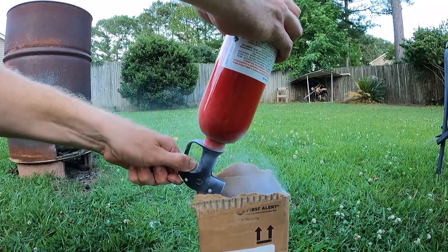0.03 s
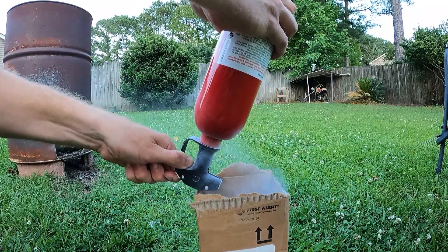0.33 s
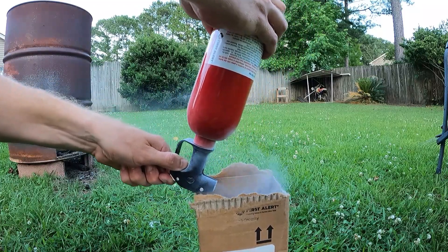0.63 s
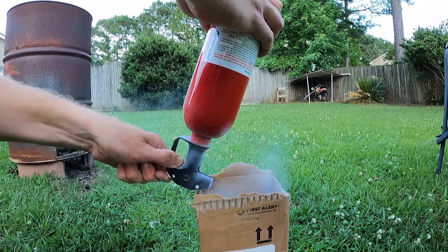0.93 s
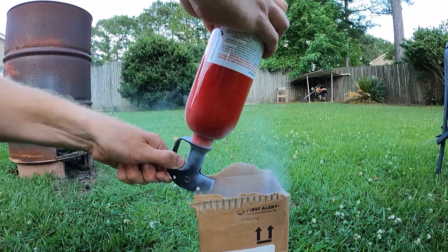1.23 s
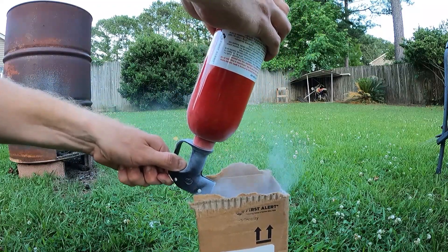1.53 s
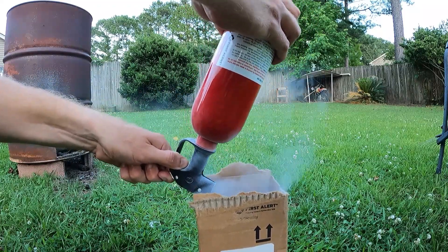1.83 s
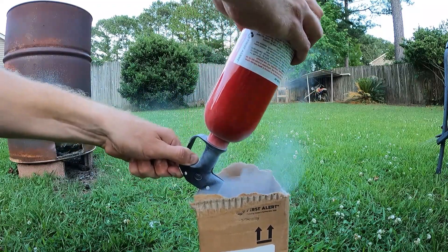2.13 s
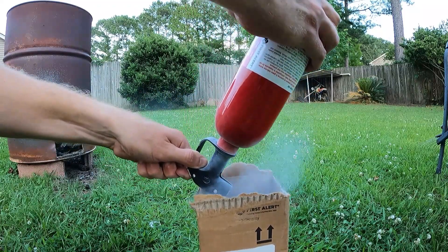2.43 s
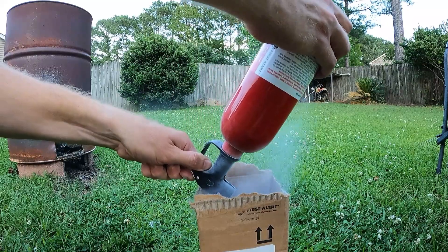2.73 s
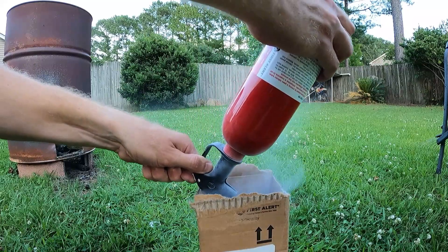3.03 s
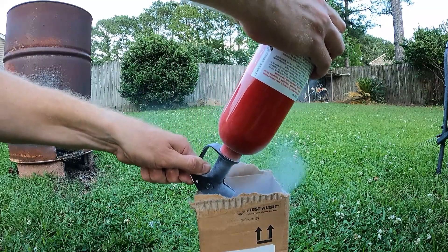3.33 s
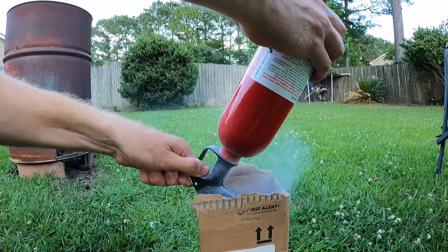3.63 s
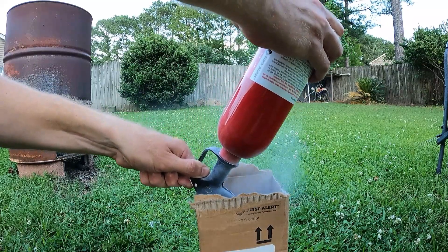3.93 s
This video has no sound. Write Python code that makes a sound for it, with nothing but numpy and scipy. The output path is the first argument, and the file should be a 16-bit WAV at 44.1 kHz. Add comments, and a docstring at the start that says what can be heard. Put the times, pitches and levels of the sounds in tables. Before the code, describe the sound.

A fire extinguisher hisses thinly into a cardboard box, close by, then pops into a sputtering burst and settles into a steadier rush. Behind it are low wind, faint sprinkler-like chuffing and one short bird phrase.

```python
"""Gas escapes from the valve of an upturned fire extinguisher into a cardboard box, on a lawn.
It starts as a thin seep over low wind and a faint, regular chuffing like a far sprinkler.
Two soft rustles pass and a bird sings one phrase. At 1.4 s the valve cracks open in a popping,
sputtering burst of gas and sizzling powder, which sinks back by 2 s.
From 2.5 s the valve opens to a steadier rush, coloured by the resonances of box and nozzle."""
import sys
import numpy as np
from scipy import signal
from scipy.fft import rfft, irfft
from scipy.io import wavfile
from scipy.ndimage import map_coordinates

SR = 44100
rng = np.random.default_rng(int(sys.argv[2]) if len(sys.argv) > 2 else 0)


def store_pcm(level_fs):
    """Save levels as 16-bit WAV."""
    pcm = np.round(np.clip(level_fs, -1, 1) * 32767).astype(np.int16)
    wavfile.write(sys.argv[1], SR, np.atleast_2d(pcm).T)


N = 176400


def jet(colour, flutter_db, flutter_hz, spit_db, spits_per_s):
    """Turbulent gas flutters and spits as powder clears the valve; resonances drift as the hands move."""
    clumps = (rng.random(N) < spits_per_s / SR) * np.minimum(rng.exponential(1, N), 3)
    spit_decay = np.exp(-np.arange(400) / (SR * 0.0005))
    spits = signal.oaconvolve(clumps, spit_decay)[:N]
    flow = amp(flutter_db * wander(flutter_hz)) * (1 + amp(spit_db) * spits)
    warped_time = np.cumsum(1 + 0.002025 * wander(rate_hz=3.94))  # bends all resonances together
    hiss = stereo_noise(colour, boxed=True, envelope=flow)
    return np.array([map_coordinates(side, [warped_time], order=5, mode="mirror") for side in hiss])


def seep():
    """Gas leaks through the barely open valve in a smooth, half-whistling hiss."""
    # leak envelope: t/s, level/dB
    flow = [(0, -57.5), (.6, -54.5), (.8, -53.5), (1.3, -52), (2.0, -52), (2.1, -61), (2.2, -55),
            (2.45, -54.5), (2.65, -48), (3.17, -47), (3.32, -58), (3.55, -52), (3.75, -50), (4, -59)]
    # leak spectrum: f/Hz, level/dB
    colour = [(600, -35), (900, -8.5), (1450, -12.5), (2400, -14.5), (4200, -8), (4750, 0), (5200, -4),
              (5650, -14), (6000, -14.5), (8300, -34), (10200, -23), (11200, -22), (16000, -45)]
    return level(flow) * jet(colour, flutter_db=1.1, flutter_hz=60, spit_db=-28, spits_per_s=92)


def burst():
    """The valve cracks open and the gas sputters out in hard surges."""
    # surge envelope: t/s, level/dB
    flow = [(1.359, -75), (1.363, -44), (1.385, -40), (1.426, -43), (1.431, -33.5), (1.50, -34),
            (1.553, -33.5), (1.566, -39), (1.615, -33), (1.664, -31), (1.70, -38.5), (1.80, -42.5),
            (1.874, -38.5), (1.918, -50), (1.936, -39.5), (1.98, -55), (2.022, -42), (2.06, -55)]
    # surge spectrum: f/Hz, level/dB
    colour = [(250, -20), (650, -14), (1200, -12), (1800, -20), (3000, -18), (4200, -8), (4750, -2),
              (5150, -5), (5650, -14.5), (6600, -26), (7700, -34), (9200, -23.5), (10200, -47),
              (11500, -23), (15500, -35)]
    return level(flow) * jet(colour, flutter_db=1.1, flutter_hz=90, spit_db=-4.5, spits_per_s=220)


def rush():
    """The valve opens again to a steadier, fuller stream."""
    # stream envelope: t/s, level/dB
    flow = [(2.48, -76), (2.56, -51), (2.66, -46.5), (2.85, -46), (3.0, -44), (3.2, -43), (3.29, -49.5),
            (3.45, -46), (3.72, -44.5), (3.9, -47), (4, -46.5)]
    # stream spectrum: f/Hz, level/dB
    colour = [(300, -12), (700, -6.5), (1200, -5.5), (1900, -14), (2400, -13), (4000, -10.5), (5000, -14),
              (5900, -10), (6700, -23.5), (7650, -13), (8700, -27), (9750, -14.5), (10800, -30),
              (13000, -20), (15500, -22)]
    gas = jet(colour, flutter_db=0.85, flutter_hz=50, spit_db=-11, spits_per_s=90.5)
    return amp(-2) * level(flow) * gas


def fizz():
    """A thin, crackly hiss rides on top of the gas, near 12 kHz."""
    # top hiss envelope: t/s, level/dB
    flow = [(0, -62.5), (.22, -56), (.35, -61.5), (.85, -64), (1.32, -70), (1.45, -60), (1.95, -55),
            (2.22, -57.5), (2.45, -56.5), (2.56, -50.5), (2.79, -49.5), (2.88, -55), (3.3, -60),
            (3.68, -51), (4, -63.5)]
    # top hiss spectrum: f/Hz, level/dB
    colour = [(7000, -29), (9200, -25.5), (10100, -16), (10900, -14), (11600, 4.5), (12250, 4.5),
              (13100, -8), (15500, -22)]
    return amp(-1) * level(flow) * jet(colour, flutter_db=1.5, flutter_hz=80, spit_db=1, spits_per_s=130)


def sizzle():
    """Powder sizzles out with the gas, strongest in the burst."""
    # powder envelope: t/s, level/dB
    flow = [(0, -66.5), (.85, -64), (1.0, -68), (1.35, -63.5), (1.41, -49.5), (1.55, -48.5), (1.8, -52),
            (2.1, -59.5), (2.3, -76), (3.48, -76), (3.56, -63), (3.86, -61.5), (3.93, -69)]
    # powder spectrum: f/Hz, level/dB
    colour = [(6000, -21), (8200, -18), (9300, -8.5), (10100, -1.5), (10700, -1.5), (12000, -8),
              (15500, -18)]
    return level(flow) * jet(colour, flutter_db=1.6, flutter_hz=70, spit_db=-17, spits_per_s=140)


def nozzle_spits():
    """Clumps of powder shoot out as sharp, bright accents in the burst."""
    # spit peaks: t/s, level/dB
    hits = [(1.435, -36), (1.483, -33.5), (1.5, -32), (1.548, -27.5)]
    # spit spectrum: f/Hz, level/dB
    colour = [(900, -32), (3500, -6.5), (4800, 6.5), (7000, -34)]
    half_length_s = 0.0058
    return swells([(s, half_length_s, db) for s, db in hits]) * stereo_noise(colour, boxed=True)


def valve_pops():
    """Two short, hollow puffs into the box as the valve cracks open."""
    # pop onsets: t/s, level/dB
    hits = [(1.3605, -34), (1.43, -36)]
    # pop spectrum: f/Hz, level/dB
    colour = [(200, -6), (700, 5), (1300, 3), (2200, -29), (5000, -34)]
    t, decay_s = np.arange(N) / SR, 0.0088
    envelope = sum(amp(db) * (t > s) * np.exp(-abs(t - s) / decay_s) for s, db in hits)
    return envelope * stereo_noise(colour, boxed=True)


def chuffs():
    """Soft, even puffs like a far sprinkler, each a stroke and a weaker return."""
    # level ride over the strokes: t/s, level/dB
    ride = [(0.1, -48.5), (.6, -49), (.85, -51.5), (2.1, -48), (3, -49), (4, -47)]
    # puff spectrum: f/Hz, level/dB
    colour = [(300, -46), (500, 7.5), (700, -6.5), (1100, 8), (1550, 5.5), (1780, 6.5), (2400, -6.5),
              (2900, -3.5), (3600, -8), (5000, -27), (6900, -18.5), (9000, -34)]
    first_s, period_s, return_s = -0.102, 0.2175, 0.109
    rise_s, hold_s, decay_s = 0.0043, 0.04, 0.018

    def stroke(delay_s):
        age = (np.arange(N) / SR - first_s - delay_s) % period_s
        return np.minimum(age / rise_s, 1) * np.exp(-np.maximum(age - hold_s, 0) / decay_s)

    pulses = stroke(0) + amp(-5) * stroke(return_s)
    return level(ride) * pulses * stereo_noise(colour, boxed=False)


def bird():
    """Whistled notes slide up and drop at the end; the short ones rasp, the long ones are purer."""
    # the phrase: start t/s, length/s, top f/Hz, closing fall/Hz, level/dB
    notes = [(0.71, 0.035, 2750, 80, -55), (0.741, 0.027, 2930, 100, -52), (.765, 0.04, 2665, 420, -48),
             (0.819, 0.029, 2660, 30, -50.5), (0.853, 0.033, 2610, 60, -52), (0.891, 0.045, 2635, 420, -46),
             (1.032, 0.075, 2605, 101, -50.5), (1.081, 0.062, 2587, 305, -46),
             (1.188, 0.078, 2760, 450, -53), (1.233, 0.15, 2296, 295, -49.5)]
    t, song = np.arange(N) / SR, np.zeros(N)
    scoop_hz, fade_db, flutter_db = 128, -3.5, 2
    waver, rasp = 0.0093 * wander(rate_hz=67), 0.027 * wander(rate_hz=330)
    shortest = min(note[1] for note in notes)
    for start, length, top_hz, fall_hz, db in notes:
        progress = np.clip((t - start) / length, 0, 1)
        arch_hz = top_hz - scoop_hz * (1 - progress) ** 2 - fall_hz * progress ** 4
        hz = arch_hz * (1 + waver + rasp * shortest / length)
        gate = np.sqrt(np.minimum(2 * abs(np.sin(np.pi * progress)), 1))
        envelope = amp(db + fade_db * (progress - 0.5)) * gate
        song += envelope * np.sin(2 * np.pi * np.cumsum(hz) / SR)
    song *= amp(flutter_db * wander(rate_hz=76))
    return garden_echoes(song, t60_s=0.23, wet_db=-2.5) * amp([[-1], [1]])  # a little to the right


def garden_echoes(x, t60_s, wet_db):
    """Fence and trees scatter a short stereo tail of reflections."""
    t, echoes_per_s = np.arange(SR // 2) / SR, 2000
    taps = rng.standard_normal((2, len(t))) * (rng.random((2, len(t))) < echoes_per_s / SR)
    taps *= amp(-60 * t / t60_s)
    tail = signal.fftconvolve(x[None], taps / np.linalg.norm(taps[0]), axes=1)[:, :N]
    return x + amp(wet_db) * tail


def rustles():
    """Two faint, airy swells in the garden."""
    # swell peaks: t/s, half length/s, level/dB
    peaks = [(0.354, 0.058, -61), (0.548, 0.077, -59.5)]
    # rustle spectrum: f/Hz, level/dB
    colour = [(2200, -27), (3000, -2.5), (3750, 3), (4400, -34)]
    return swells(peaks) * stereo_noise(colour, boxed=False)


def outdoors():
    """A bed of low wind rumble under the soft wash of the yard."""
    # wind spectrum: f/Hz, level/dB
    wind_colour = [(15, -22), (28, -6), (41, 1.5), (55, 1), (80, -3.5), (125, 0.5), (170, -1.5), (205, -8),
                   (295, -13.5), (330, -13.5), (410, -25.5), (520, -27), (650, -38.5), (1200, -73)]
    # yard ambience spectrum: f/Hz, level/dB
    yard_colour = [(300, 3.5), (700, -9.5), (980, 5), (1400, 0.5), (1900, -7.5), (2600, -11.5), (3600, -18),
                   (6000, -30), (10000, -39), (16000, -31)]
    rumble = stereo_noise(wind_colour, boxed=False, envelope=amp(0.26 * wander(rate_hz=2.2)))
    wash = stereo_noise(yard_colour, boxed=False, envelope=amp(1.24 * wander(rate_hz=40)))
    return amp(-35) * rumble + amp(-53) * wash


def cardboard_box(hz):
    """Gain per frequency: box and nozzle resonate, and quick echoes off the walls ripple the treble."""
    # box and nozzle resonances: f/Hz, width/Hz, lift/dB
    modes = [(958, 190, 14), (1271, 91, 9), (1465, 243, 15), (2023, 170, 10.5), (2700, 100, 9),
             (4750, 220, 7.5), (5610, 120, 4.5), (10040, 280, 5.5)]
    t60_s, echo_db = 0.027, -22
    resonance_db = sum(lift / (1 + (2 * (hz - f) / width) ** 2) for f, width, lift in modes)
    wall_echoes = rng.standard_normal(N) * amp(-60 * np.arange(N) / SR / t60_s)
    ripple = 4 * hz / (hz + 3000) * unit(abs(rfft(wall_echoes)))
    return amp(resonance_db) * (1 + amp(echo_db) * ripple)


def stereo_noise(colour, boxed, envelope=1):
    """Coloured noise of rms 1, in the box or the open yard: centred in the bass, wider above."""
    # left-right coherence in the box: f/Hz, coherence/0..1
    box_coherence = [(300, 0.93), (1400, 0.91), (2500, 0.78), (4700, 0.94), (5800, 0.91), (11800, 1),
                     (12600, 0.71), (16000, 0.41)]
    # left-right coherence in the yard: f/Hz, coherence/0..1
    yard_coherence = [(100, 1), (350, 0.85), (800, 0.75), (1500, 0.73), (2400, 0.3), (6000, 0.79)]
    # pan in the box: f/Hz, left over right/dB
    box_pan = [(300, 3), (1200, 0), (2600, 1), (5000, 1.2), (7500, 0), (10800, 0.5), (12200, -8),
               (14000, -7), (16000, 10)]
    # pan in the yard: f/Hz, left over right/dB
    yard_pan = [(1100, -2), (1700, 0), (2600, -5), (6000, -3)]
    # phase between the sides: f/Hz, left lead/rad
    phase_lead = [(30, 2.5), (400, 0.14), (1500, 0.17), (2200, 0.65), (4700, .5), (6500, -0.7),
                  (11300, 0.93), (12200, -0.2), (13300, 11), (16000, 8.5)]
    hz, mono_below_hz = np.fft.rfftfreq(N, 1 / SR), 403
    left, independent = rfft(envelope * rng.standard_normal((2, N)))
    gain = amp(over_hz(colour, hz))
    if boxed:
        gain *= cardboard_box(hz)
    coherence, pan = (box_coherence, box_pan) if boxed else (yard_coherence, yard_pan)
    width = 1 / (1 + (mono_below_hz / (hz + 1)) ** 4)
    shared = np.minimum(1 - width * (1 - over_hz(coherence, hz)), 0.9997)
    lean = amp(width * over_hz(pan, hz) / 2)
    right = shared * left + np.sqrt(1 - shared ** 2) * independent
    right *= np.exp(-1j * width * over_hz(phase_lead, hz))
    return unit(irfft(np.array([left * lean, right / lean]) * gain, N))


def swells(peaks):
    """An envelope of bell curves from rows of t/s, half length/s, level/dB."""
    t = np.arange(N) / SR
    return sum(amp(db) * np.exp(-((t - s) / half) ** 2) for s, half, db in peaks)


def wander(rate_hz):
    """Random drift of rms 1, rolling off above the given rate."""
    hz = np.fft.rfftfreq(N, 1 / SR)
    drift = rfft(rng.standard_normal(N)) * hz / (hz + 2) / (1 + (hz / rate_hz) ** 2)
    return unit(irfft(drift, N))


def level(points):
    """A dB envelope as a gain for every sample."""
    return amp(np.interp(np.arange(N) / SR, *np.transpose(points)))


def over_hz(points, hz):
    """Reads a curve on a log-frequency axis."""
    f, value = np.transpose(points)
    return np.interp(np.log(hz + 1), np.log(f + 1), value)


def amp(db):
    """Decibels to gain."""
    return 10 ** (np.asarray(db) / 20)


def unit(x):
    """Scales to rms 1."""
    return x / np.sqrt(np.mean(x ** 2) + 1e-20)


def scene():
    """The extinguisher up close, the garden behind."""
    extinguisher = seep() + burst() + rush() + fizz() + sizzle() + nozzle_spits() + valve_pops()
    return extinguisher + chuffs() + bird() + rustles() + outdoors()


def record(dry):
    """A steep low-pass takes the very top off the mix."""
    cutoff_hz = 15680
    taps = signal.firwin(511, cutoff_hz, window=("kaiser", 9), fs=SR)
    return signal.oaconvolve(dry, taps[None], "same")


dry = scene()
out = record(dry)
store_pcm(out)
```